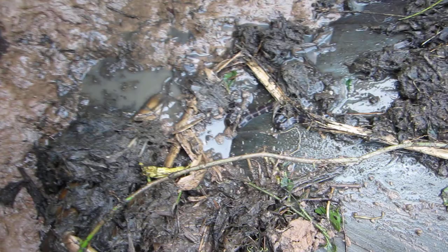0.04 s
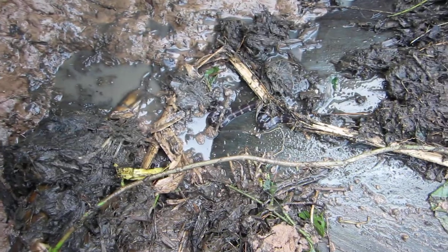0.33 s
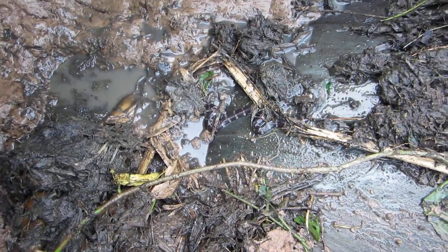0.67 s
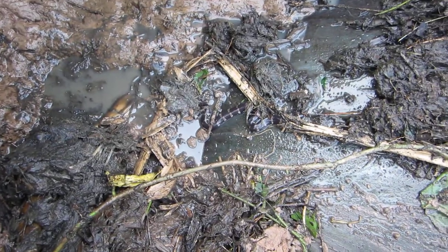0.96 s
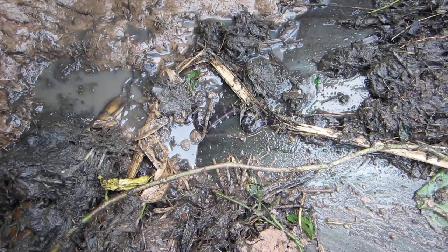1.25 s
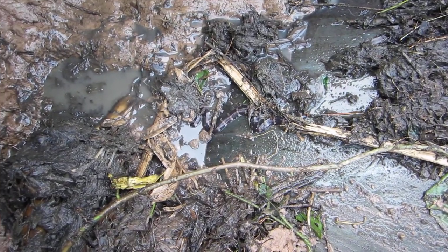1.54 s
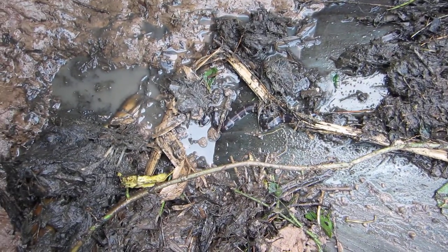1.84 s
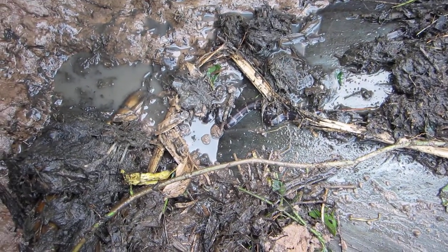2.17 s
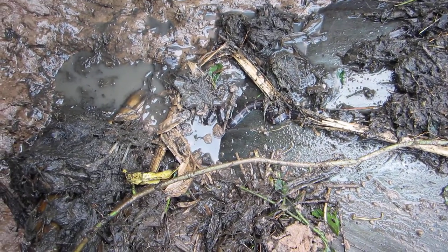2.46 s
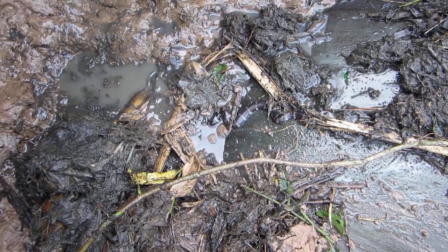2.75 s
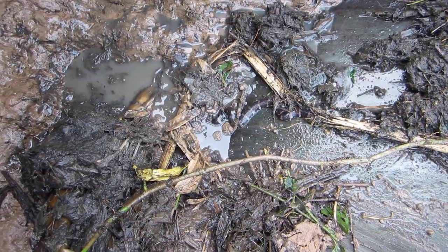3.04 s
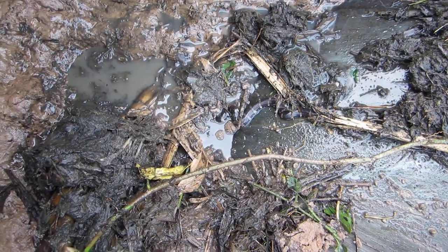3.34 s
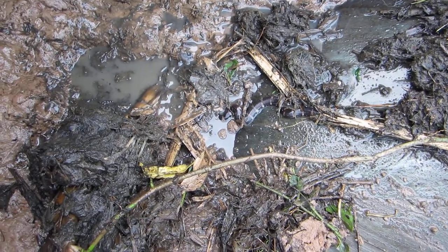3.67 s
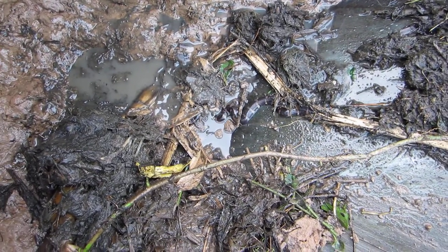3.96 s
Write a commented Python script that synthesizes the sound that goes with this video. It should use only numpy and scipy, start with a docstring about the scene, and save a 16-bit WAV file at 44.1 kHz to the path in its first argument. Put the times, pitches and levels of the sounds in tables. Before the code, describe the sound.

A diesel engine idles some way off at a muddy outdoor site, rumbling and clattering steadily. It swells in the first second with faint squeaks, while a soft hiss, shrill insects and a few wet rustles sit behind it.

```python
"""First comes the boom of a four-cylinder diesel, idling at about 920 rpm some way off on a muddy site.
Periodic firing gives the exhaust its harmonics, and one of them beats against a second hum. Gears
whine, impacts in the block clatter in the same pattern on every turn, and a loose panel rings at its
resonances once per cycle. Behind the engine lie a wet hiss and shrill insects. A pulley squeaks as
the sound swells in the first second, and the mud gives a few soft rustles."""
import sys
import numpy as np
from scipy import signal
from scipy.fft import rfft, irfft
from scipy.io import wavfile

SR = 44100
rng = np.random.default_rng(int(sys.argv[2]) if len(sys.argv) > 2 else 0)


def store_pcm(level_fs):
    """Save levels as 16-bit WAV."""
    pcm = np.round(np.clip(level_fs, -1, 1) * 32767).astype(np.int16)
    wavfile.write(sys.argv[1], SR, np.atleast_2d(pcm).T)


N = 176400
T = np.arange(N) / SR
CYCLE_HZ = 7.665  # one cycle is two turns of the crank and four firings


def from_db(db):
    """Amplitude ratio of a level in decibels."""
    return 10 ** (np.asarray(db) / 20)


def unit_rms(x):
    """Normalisation to unit power."""
    return x / np.sqrt(np.mean(x ** 2) + 1e-20)


def in_time(rows):
    """Linear interpolation of each column of a timed table to every sample."""
    times, *columns = np.transpose(rows)
    return [np.interp(T, times, column) for column in columns]


def drift(rate_hz):
    """Low-passed noise: a slow random fluctuation of unit spread."""
    pole = np.exp(-80 * np.pi * rate_hz / SR)
    slow = signal.lfilter([1], [1, -2 * pole, pole * pole], rng.standard_normal(N // 40 + 2002))[2000:]
    return np.interp(np.arange(N) / 40, np.arange(len(slow)), unit_rms(slow))


def colour(x, spectrum):
    """Spectral shaping by a smooth curve, at unit power."""
    hz, db = np.transpose(spectrum)
    log_hz = np.log(np.maximum(np.fft.rfftfreq(N, 1 / SR), 1))
    gain = from_db(np.interp(log_hz, np.log(hz), db, left=-80, right=-80))
    return unit_rms(irfft(rfft(x) * gain, N))


def resonate(x, hz, width_hz):
    """Forced response of one damped resonance."""
    r = np.exp(-np.pi * width_hz / SR)
    return signal.lfilter([1, 0, -1], [1, -2 * r * np.cos(2 * np.pi * hz / SR), r * r], x)


def tone(turns, db):
    """Simple harmonic motion at a given rms level."""
    return np.sqrt(2) * from_db(db) * np.cos(2 * np.pi * turns)


def swells(rows):
    """A sum of short Gaussian envelopes."""
    return sum(from_db(db) * np.exp(-(2 * (T - centre) / length) ** 2) for centre, length, db in rows)


# Each entry: level in dB of the harmonic at 1, 2, 3, .. times the firing rate.
EXHAUST_DB = [-34.5, -32, -23, -33, -40, -77, -42.5, -44.5]
# Each row: time in seconds, beat rate in Hz, level of the second hum in dB.
SECOND_HUM = [(0, 3.8, -31), (1.1, 3.34, -31.5), (1.5, 3.63, -24.5), (1.95, 4.26, -20.5), (2.5, 4.55, -35),
              (3.3, 4.2, -48), (4, 4.2, -22.5)]
# Each row: frequency in Hz, relative spectral density in dB.
RUMBLE_SPECTRUM = [(18, -35), (26, -6), (36, -24), (50, -3.5), (69, -11), (82, -4.5), (100, 8), (116, 2.5),
                   (135, -7), (160, -14.5), (185, -32)]
# Each row: time in seconds, level in dB.
RUMBLE_LEVEL = [(.1, -27.5), (1.2, -26), (2.1, -28), (2.7, -25.5), (3.3, -26.5), (3.8, -21.5)]
def exhaust(cycles, puff_depth_db=2.0, in_phase_s=.4875):
    """Periodic puffs give harmonics and turbulent rumble; a hum just below the third harmonic beats."""
    firings = 4 * cycles - .67  # a puff falls on each whole number
    harmonics = sum(tone(k * firings, db + .06 * drift(3.3)) for k, db in enumerate(EXHAUST_DB, 1))
    beat_hz, hum_db = in_time(SECOND_HUM)
    beats = np.cumsum(beat_hz) / SR
    hum = tone(3 * firings - beats + np.interp(in_phase_s, T, beats), hum_db)
    puffs = from_db(puff_depth_db * np.cos(2 * np.pi * firings)) * rng.standard_normal(N)
    rumble_db, = in_time(RUMBLE_LEVEL)
    return from_db(rumble_db) * colour(puffs, RUMBLE_SPECTRUM) - harmonics - hum


# Each entry: frequency of a gear or casing tone as a multiple of the cycle rate.
WHINE_ORDERS = [6, 26, 36, 38, 40, 45, 60, 64, 70, 80, 88, 94, 98, 146]
# Each entry: level of the matching tone in dB.
WHINE_DB = [-51, -49.5, -51, -46.5, -53, -47, -43, -39.5, -39, -48.5, -45, -55.5, -38.5, -47.5]
def gears(cycles, peak_place=.92, scatter_turns=.2):
    """Constructive interference: wavering tones locked to the crank peak together once per cycle."""
    whine = 0
    for order, db in zip(WHINE_ORDERS, WHINE_DB):
        phase = order * (cycles - peak_place) + scatter_turns * rng.random() + .031 * drift(8)
        whine += tone(phase, db + drift(4.7))
    return whine


def impacts(periods, hits, decay_s, rise_s=.00073, spread_db=1.5):
    """Envelope of damped impacts, of varying strength, at set places in every period."""
    place, db = np.transpose(hits)
    count = np.arange(-1, int(periods[-1]) + 2)[:, None]
    strength = from_db(db + spread_db * rng.standard_normal((80, len(db)))[:len(count)])
    onsets = np.searchsorted(periods, count + place)
    envelope = np.bincount(onsets.ravel(), strength.ravel(), N + 1)[:N] * (T > 0)
    for seconds in (rise_s, decay_s):
        envelope = signal.lfilter([1], [1, -np.exp(-1 / (seconds * SR))], envelope + 1e-18)
    return unit_rms(envelope)


def grit(cycles, repeat_share=.76):
    """Partly periodic contact noise: a share of its power recurs every cycle, the rest is new."""
    period = int(SR / CYCLE_HZ)
    recurring = rng.standard_normal(period)[(cycles % 1 * period).astype(int)]
    return np.sqrt(repeat_share) * recurring + np.sqrt(1 - repeat_share) * rng.standard_normal(N)


# Each row: place as a share of one crank turn, relative thud level in dB, relative clack level in dB.
CONTACTS = [(.03, 2.5, -3), (0.243, 4.5, -2), (.46, -2, -6.5), (.61, -3.5, -3.5), (0.818, -3.5, -1)]
# Each row, in both: frequency in Hz, relative spectral density in dB.
THUD_SPECTRUM = [(150, -22), (180, -15), (203, -3), (240, 4), (300, 3.5), (350, 0.5), (390, -15.5),
                 (450, -30)]
CLACK_SPECTRUM = [(380, -24), (420, -2.5), (490, 3.5), (570, 4), (700, 1.5), (880, -1), (1250, -4.5),
                  (1650, -4.5), (2400, -16.5), (5000, -20.5)]
def block(cycles, floor=.24):
    """Impact excitation: each contact gives a low thud and a brighter clack over a floor of noise."""
    contacts = np.array(CONTACTS)
    thuds = (floor + impacts(2 * cycles, contacts[:, [0, 1]], decay_s=.005)) * grit(cycles)
    clacks = (floor + impacts(2 * cycles, contacts[:, [0, 2]], decay_s=.0083)) * grit(cycles)
    return from_db(-35) * colour(thuds, THUD_SPECTRUM) + from_db(-32.5) * colour(clacks, CLACK_SPECTRUM)


# Each row: place as a share of the cycle, relative level in dB.
PANEL_HITS = [(.79, 3), (.85, -7), (.92, 4), (.99, -8)]
# Each row: frequency in Hz, bandwidth in Hz, relative level in dB.
PANEL_RESONANCES = [(1403, 170, -4), (1610, 95, -3), (2400, 700, 4), (3900, 1900, -1)]
# Each row: frequency in Hz (rounded below to a harmonic of the cycle rate), relative level in dB.
PANEL_NOTES = [(1401, -3.5), (1342, -7.5), (1613, -10), (2050, -14), (2277, -11), (3000, -13)]
# Each row: time in seconds, level of the notes in dB.
RING_LEVEL = [(.1, -52), (1.2, -47), (2, -42.5), (2.6, -41), (3.15, -39), (3.7, -40.5), (4, -41.5)]
def panel(cycles):
    """Resonance: a run of touches rattles a loose panel once per cycle and leaves its notes ringing."""
    touches = impacts(cycles, PANEL_HITS, decay_s=.0068) * grit(cycles)
    rattle = sum(from_db(db) * unit_rms(resonate(touches, hz, width))
                 for hz, width, db in PANEL_RESONANCES)
    ring_db, = in_time(RING_LEVEL)
    notes = sum(tone(np.round(hz / CYCLE_HZ) * cycles + .082 * drift(10), ring_db + db)
                for hz, db in PANEL_NOTES)
    return from_db(-46.5) * unit_rms(rattle) + notes * impacts(cycles, PANEL_HITS, decay_s=.012)


def crackle(per_second=700, spread_db=2.5):
    """Shot noise: tiny clicks of random size arrive independently."""
    sizes = from_db(spread_db * np.minimum(rng.exponential(1, N), 4)) * rng.choice([-1, 1], N)
    return from_db(-8.5) * unit_rms(sizes * (rng.random(N) < per_second / SR))


# Each row: frequency in Hz, relative spectral density in dB.
HISS_SPECTRUM = [(150, -19), (400, -2.5), (900, 0.5), (2000, 1), (3300, -2), (5500, -5), (8000, -8.5),
                 (11300, -13), (13500, -15), (15700, -23)]
# Each row: time in seconds, level in dB before the gain.
HISS_LEVEL = [(.07, -45), (.44, -43.5), (.5, -42), (.6, -42.5), (.75, -42.5), (.79, -40), (.92, -37),
              (1.0, -40), (1.15, -36.5), (1.38, -38.5), (1.6, -36.5), (2.1, -37), (2.8, -39), (3.5, -39),
              (4, -38)]
def wet_hiss(clicks, gain_db=4, flutter_db=.53):
    """Broadband noise with fine clicks in it is heard as a wet hiss."""
    level_db, = in_time(HISS_LEVEL)
    hiss = colour(rng.standard_normal(N) + clicks, HISS_SPECTRUM)
    return from_db(level_db + gain_db + flutter_db * drift(15)) * hiss


# Each row: frequency in Hz, rough bandwidth in Hz, level in dB, waver in dB, waver rate in Hz.
INSECT_BANDS = [(12300, 240, -54.5, 1.5, 6), (12020, 240, -55.5, 1.7, 6)]
# Each row: time in seconds, gain of both bands in dB.
INSECT_GAIN = [(.1, 4), (.5, -2), (.7, 5), (1.05, 2), (1.5, 0), (1.8, -2), (2.15, 4.5), (2.65, -1.5),
               (3.2, 0), (4, 0)]
def insects():
    """Amplitude modulation: narrow, shrill bands of noise come and go."""
    chorus = 0
    for hz, width, db, waver_db, waver_hz in INSECT_BANDS:
        waver = from_db(waver_db * drift(waver_hz))
        band = resonate(rng.standard_normal(N), hz, 1.5 * width)
        band = resonate(band, hz, 1.5 * width)  # a second pass narrows the band
        chorus += from_db(db) * unit_rms(waver * band)
    gain_db, = in_time(INSECT_GAIN)
    return from_db(gain_db) * chorus


# Each row: centre in seconds, length in seconds, peak level in dB.
SQUEAKS = [(.088, 0.019, -51), (0.253, 0.015, -43), (.29, 0.021, -47), (0.423, 0.027, -45),
           (.515, 0.02, -44), (0.546, .035, -40.5), (.615, .025, -47), (.68, .02, -52)]
def pulley(swell_db, pitch_hz=2890, wander_hz=28.1, floor_db=-49.5):
    """Frequency modulation makes a thin, unsteady squeal: short squeaks, then a faint flicker."""
    level = from_db(swell_db + floor_db + 1.7 * drift(27)) + swells(SQUEAKS)
    phase = np.cumsum(pitch_hz + wander_hz * drift(64)) / SR
    return level * tone(phase, 0)


# Each row: centre in seconds, length in seconds, peak level in dB.
RUSTLES = [(.48, 0.034, -43), (.93, .05, -43), (1.205, 0.032, -41), (1.555, .04, -41), (1.93, 0.027, -47)]
# Each row: frequency in Hz, relative spectral density in dB.
RUSTLE_SPECTRUM = [(2500, -14), (5000, 2), (10000, 1), (13000, -6), (15700, -16)]
def mud_rustles(clicks):
    """Brief bursts of high-frequency noise are heard as soft, wet rustles in the mud."""
    return swells(RUSTLES) * colour(rng.standard_normal(N) + clicks, RUSTLE_SPECTRUM)


# Each row: time in seconds, gain in dB of the engine, the insects and the pulley's faint flicker.
SWELL = [(.07, -6.5), (.4, -4.5), (.8, -3.5), (1.2, -1), (2, -1), (2.8, -1), (3.5, -0.6), (4, -0.5)]
def scene(speed_wander=.0007):
    """Superposition: one crank drives exhaust, gears, block and panel; the other sounds add to them."""
    cycles = np.cumsum(CYCLE_HZ * (1 + speed_wander * drift(2))) / SR
    swell_db, = in_time(SWELL)
    engine = exhaust(cycles) + gears(cycles) + block(cycles) + panel(cycles)
    mix = from_db(swell_db) * (engine + insects()) + pulley(swell_db)
    clicks = crackle()
    return (mix + wet_hiss(clicks) + mud_rustles(clicks))[None]


def record(dry, start_s=.072, cutoff_hz=15700):
    """Gating and low-pass filtering: the sound cuts in after a brief silence, its top treble removed."""
    gated = dry * np.clip((T - start_s) / .0013, 0, 1)
    return signal.sosfilt(signal.ellip(12, .1, 90, cutoff_hz, fs=SR, output="sos"), gated)


dry = scene()
out = record(dry)
store_pcm(out)
```